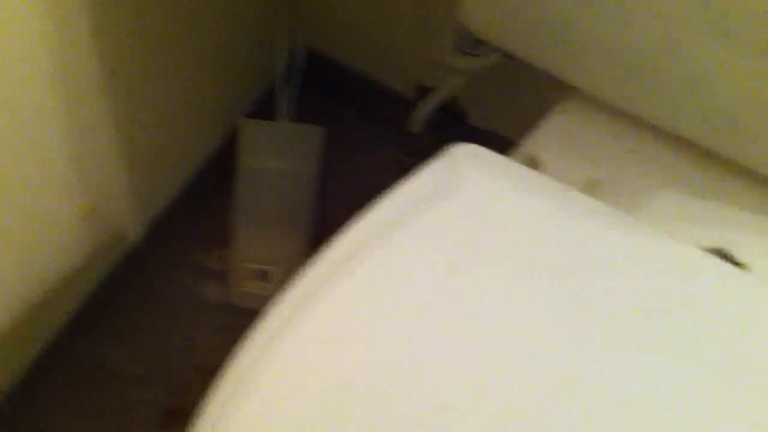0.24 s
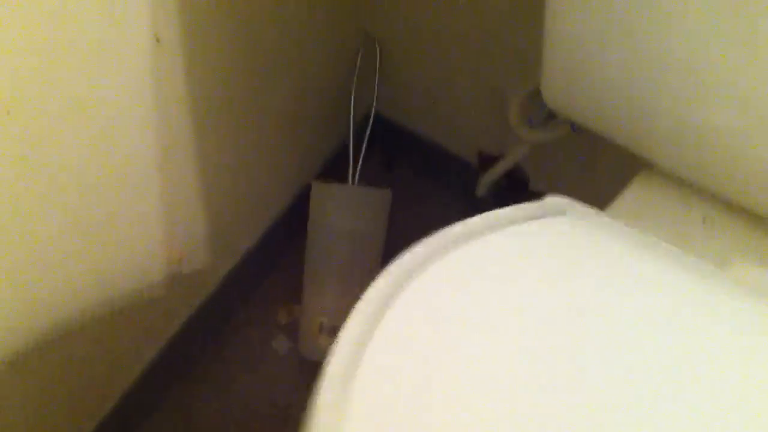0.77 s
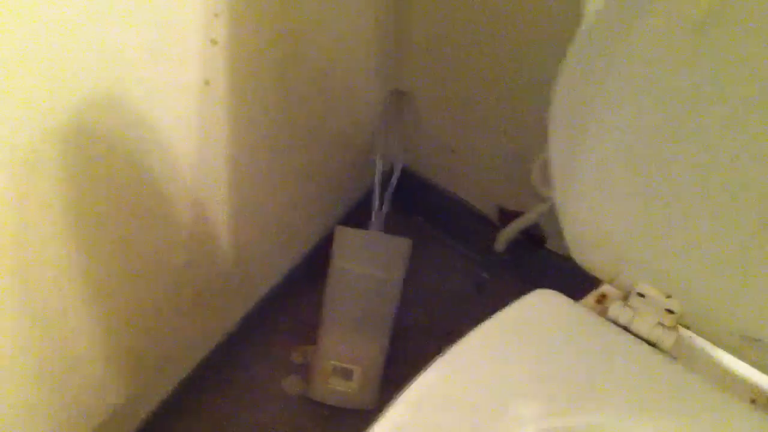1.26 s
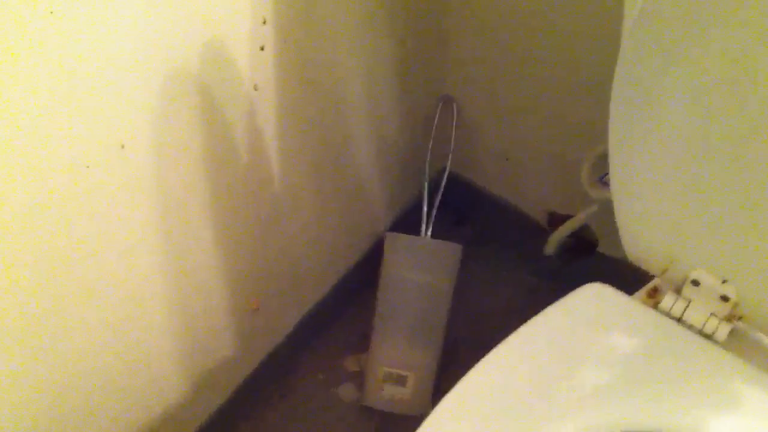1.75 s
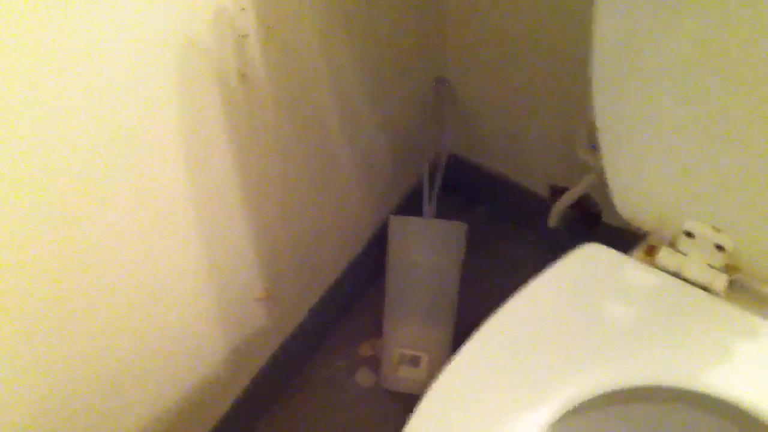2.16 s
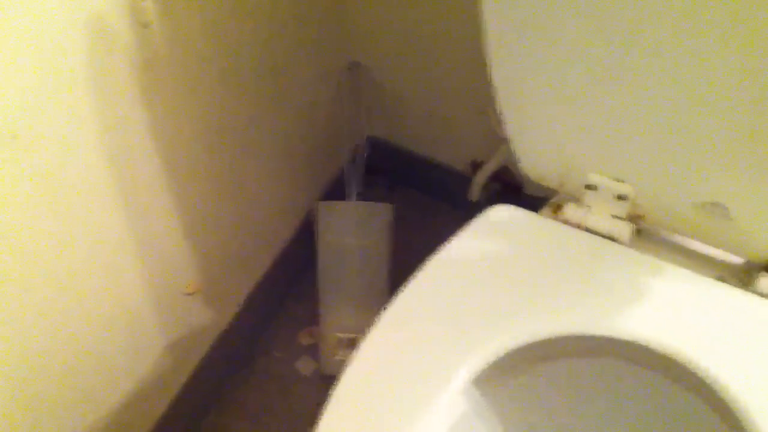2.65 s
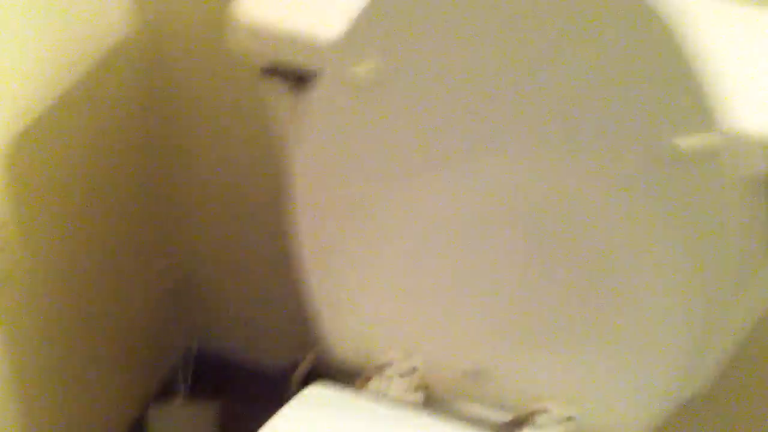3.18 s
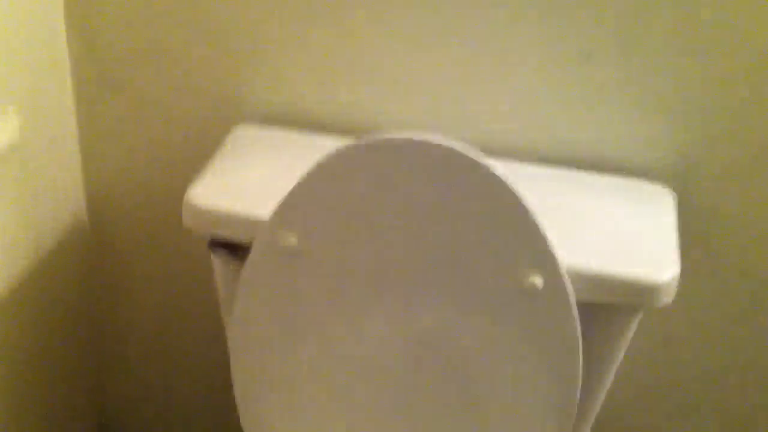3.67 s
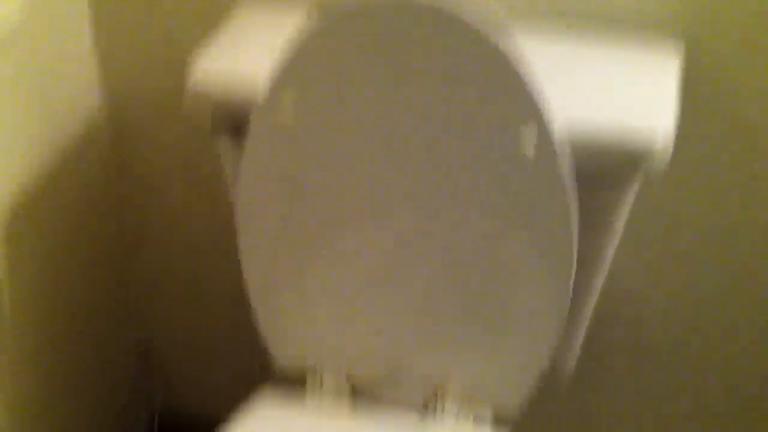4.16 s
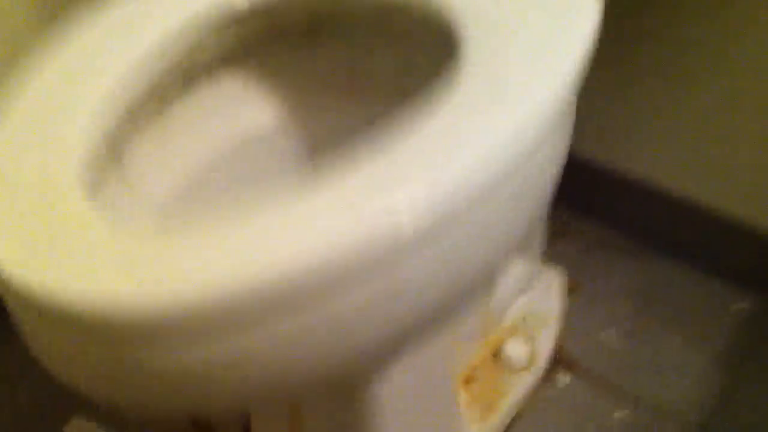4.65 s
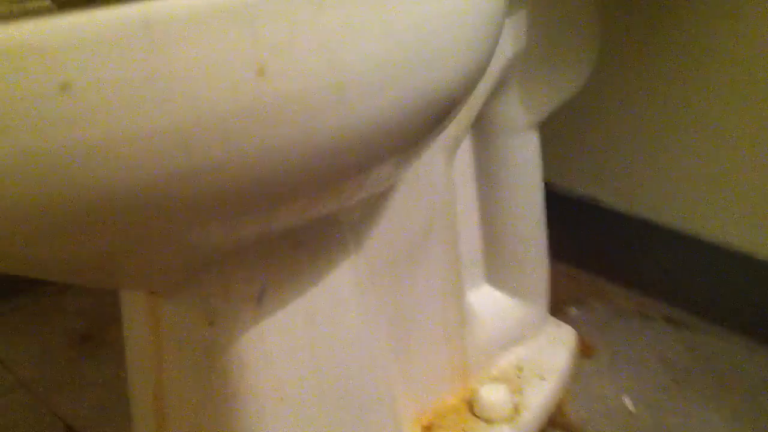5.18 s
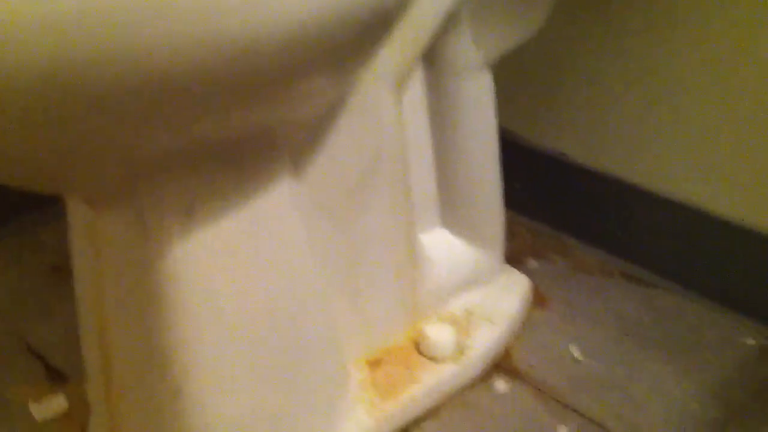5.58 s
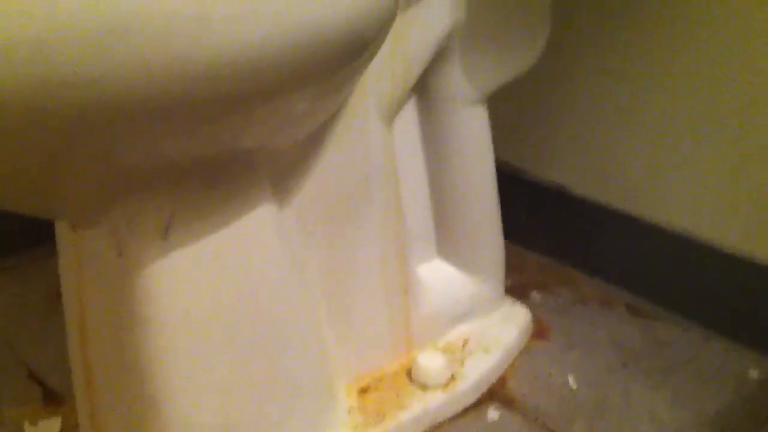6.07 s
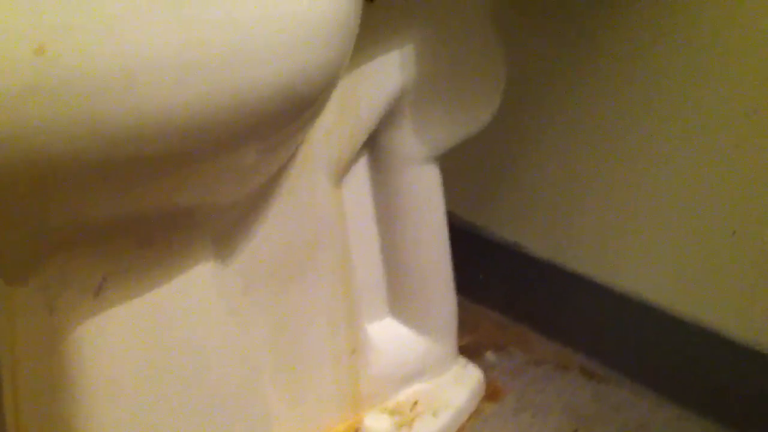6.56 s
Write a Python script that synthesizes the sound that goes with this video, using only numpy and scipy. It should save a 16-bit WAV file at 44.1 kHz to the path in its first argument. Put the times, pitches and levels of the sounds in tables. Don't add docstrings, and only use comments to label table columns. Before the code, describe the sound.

A small, hard-walled restroom, heard through a hand-held mono microphone. From the start an extractor fan runs quietly: soft air rush, dull rumble and a low, slightly wavering hum, with a very faint distant tap at 0.2 seconds. At about 2.6 a plastic toilet lid strikes the ceramic tank, by far the loudest event: a bright, hollow clack whose rapid rebounds blur together within a tenth of a second, ringing briefly with a short tiled wash. From 3.1 to 3.5 cloth and sleeve whisper faintly. Around 4.4 rustling resumes, with a faint tap near 4.7, and grows brighter as the microphone dips. At 5.1 the case is jolted in a short, coarse, stuttering scuff. The fan's rush then drops sharply behind the bowl. Small dull palm thuds and finger ticks cluster around 5.4 and 5.8, then only weak air, fading rumble, hum and hiss remain until 6.8.

```python
import sys
import numpy as np
from scipy import signal
from scipy.fft import rfft, irfft, next_fast_len
from scipy.io import wavfile
from scipy.ndimage import uniform_filter1d

SR = 44100
rng = np.random.default_rng(int(sys.argv[2]) if len(sys.argv) > 2 else 0)


def pcm_store(signal):
    levels = np.round(np.clip(np.atleast_2d(signal), -1, 1) * 32767)
    wavfile.write(sys.argv[1], SR, levels.astype(np.int16).T)


def to_linear_factor(level_db):
    exponent = np.asarray(level_db, float) / 20
    return 10 ** exponent


N = 300673

# (time [s], strength [dB])
CONTACTS = [
    (2.5885, -9.5),
    (2.5916, -10),
    (2.599, -11.5),
    (2.617, -20),
    (2.665, -27),
]
# (time [s], spot number)
MIC_SPOTS = [
    (0, 0),
    (1.2, 0),
    (1.6, 1),
    (2.7, 1),
    (3.3, 2),
    (4.4, 2),
    (5.1, 3),
    (6.82, 3),
]
JOLT_S = 5.082
LANDS_S = 5.142


def knock():
    return filtered(impact_modes() + tile_wash(), 2, 110, "high") + crack()


def impact_modes():
    # (frequency [Hz], level [dB], t60 [s])
    lid_tank_modes = [(191, 0, 0.18), (308, -12.5, .3), (376, -9, 0.2), (413.4, -16.5, .55), (465, -13, 0.38),
                      (509, -3.5, 0.41), (541.6, -13, 0.32), (594, -12, 0.29), (640, -17.5, .19),
                      (672, -16, 0.25), (782, -15, .25), (817, -20.5, 0.3), (863, -9, 0.28), (894, -6.5, 0.44),
                      (945, -14.5, 0.16), (994, -8, .22), (1027, -8, 0.15), (1330, -20.5, 0.27),
                  (1374, -15, 0.16), (1538, -8, 0.11), (1610, -3.5, 0.034), (1623, -15, .18),
                  (1837, -11.5, .22), (2125, -17, 0.13), (2510, -23.5, 0.14), (2773, -22.5, .26),
                  (3145, -23.5, 0.2), (3343, -22.5, .17),
                      (4040, -22, .14), (4825, -13.5, 0.079), (5200, -13, .15), (5615, -12, .12)]
    s, strength_db = np.transpose(CONTACTS)
    out = np.zeros(N)
    for hz, mode_db, t60_s in lid_tank_modes:
        uneven_db = rng.normal(0, 0.92, len(s))
        hits = clicks(s, to_linear_factor(strength_db + mode_db - 2.5 + uneven_db) * rng.choice([-1, 1]))
        r, w = to_linear_factor(-60 / (t60_s * SR)), 2 * np.pi * hz / SR
        out += signal.lfilter([0, np.sin(w)], [1, -2 * r * np.cos(w), r * r], hits)
    return filtered(out, 4, [120, 3000], "band")


def tile_wash():
    # (frequency [Hz], density [dB per Hz])
    wash_spectrum = [(80, -34.5), (180, -20), (350, -8.5), (600, -8), (950, -5), (1250, -13.5),
                     (1600, -14.5), (2500, -18.5), (4400, -31.5), (6000, -35.5), (8000, -50), (11000, -61)]
    # (frequency [Hz], t60 [s])
    wash_t60 = [(100, 0.85), (260, 0.51), (700, 0.3), (1840, 0.25), (4850, 0.29)]
    noise = coloured(wash_spectrum)
    edges_hz = 60 * 2 ** np.arange(0, 8.1, .5)
    out = np.zeros(N)
    for low, high in zip(edges_hz, edges_hz[1:]):
        t60_s = at_hz(wash_t60, np.sqrt(low * high))
        out += to_linear_factor(-7) * filtered(noise, 2, [low, high], "band") * decay(CONTACTS[0][0], t60_s, rise_s=0.001)
    return out


def crack():
    noise = filtered(rng.standard_normal(N), 4, [2500, 7500], "band")
    noise += 4.5 * resonance(noise, 5100, 600)
    return to_linear_factor(-22.5) * noise * decay(CONTACTS[0][0], 0.018, rise_s=0.00084)


def taps():
    # (time [s], level [dB], t60 [s], frequency [Hz])
    tap_events = [
        (0.192, -47.5, 0.14, 1390),
        (4.66, -48.5, 0.13, 2220),
        (4.661, -55, 0.055, 3640),
    ]
    white = rng.standard_normal(N)
    out = np.zeros(N)
    for s, db, t60_s, hz in tap_events:
        out += to_linear_factor(db + 3.0) * decay(s, t60_s, rise_s=0.0011) * narrow(white, hz, 0.71 * hz)
    return out


def handling():
    return jolt_scuff() + palm_thuds() + finger_ticks()


def jolt_scuff():
    # (frequency [Hz], density [dB per Hz])
    scuff_spectrum = [(22, -9), (70, -18.5), (130, -6.5), (250, -6.5), (450, -6.5), (800, -11),
                      (1200, -14.5), (1650, -20), (2500, -22.5), (4400, -30), (8000, -44), (17300, -58.5)]
    # (frequency [Hz], width [Hz], level [dB])
    case_modes = [(150, 70, 1.5), (346.3, 62, -3), (812, 27, 0.5), (1558, 350, -3)]
    rub = coloured(scuff_spectrum)
    even_rub = rub / np.sqrt(uniform_filter1d(rub ** 2, size=SR // 120))
    friction = bursts(slips(count=9)) * even_rub
    scuff = 0.61 * friction + sum(to_linear_factor(db - 0.5) * resonance(friction, hz, w) for hz, w, db in case_modes)
    body = filtered(scuff, 2, 1100)
    dulling_db = -159.5 * np.maximum(np.arange(N) / SR - JOLT_S, 0)
    return body + to_linear_factor(dulling_db) * (scuff - body)


def slips(count):
    gap_s, length_s, jolt_db, uneven_db = .0092, .0078, -9.5, 0.8
    rise_db, first_loss_db, fall_db = 3.5, 2, 2
    k = np.arange(count) - 3
    chance = rng.normal(0, 1, (count, 2)) * (k != 0)[:, None]
    loss_db = np.where(k > 0, first_loss_db + fall_db * k, rise_db * k ** 2)
    level_db = jolt_db - loss_db + uneven_db * chance[:, 0]
    start_s = JOLT_S + gap_s * (k + 0.14 * chance[:, 1])
    return list(zip(start_s, level_db, length_s * np.where(k <= 0, 1.3, .8)))


def palm_thuds():
    # (time [s], strength [dB], length [s])
    thud_events = [(4.647, -47, 0.012), (4.67, -50, 0.038), (5.039, -36.5, .004), (5.152, -42.5, 0.017),
                   (5.17, -46.5, 0.024), (5.215, -54, 0.01), (5.28, -62, 0.026), (5.34, -57, 0.016),
                   (5.427, -46.5, 0.025), (5.445, -43.5, 0.011), (5.465, -47, 0.014), (5.77, -50.5, 0.018)]
    return bursts(thud_events) * coloured([(80, -9.5), (140, 4), (300, -0.5), (600, -7), (1200, -18.5), (5000, -37)])


def finger_ticks():
    # (time [s], peak level [dB])
    tick_events = [
        (5.038, -39.5),
        (5.395, -44.5),
        (5.461, -43),
        (5.492, -49),
        (5.688, -48),
        (5.786, -44),
        (5.861, -40.5),
        (5.888, -54),
    ]
    s, peak_db = np.transpose(tick_events)
    return filtered(clicks(s, to_linear_factor(peak_db + 22)), 1, [130, 1300], "band")


def rustle():
    # (time [s], level [dB], length [s], share of top hiss [0-1])
    cloth_moves = [
        (3.136, -62, 0.12, .3),
        (3.28, -67.5, .12, 0.2),
        (3.456, -56.5, 0.14, .2),
        (4.38, -59, 0.15, 0.25),
        (4.562, -57.5, 0.14, 0.3),
        (4.67, -61, .07, .9),
        (4.82, -56.5, 0.2, 0.8),
        (5.0, -53.5, 0.15, 0.76),
        (5.081, -44.5, 0.065, 0.7),
    ]
    # (frequency [Hz], density [dB per Hz])
    cloth_spectrum = [(880, -20), (1500, -32.5), (1610, -25.5), (2630, -10), (6950, -6), (10700, -15),
                      (16400, -15), (17300, -17.5)]
    cloth = coloured(cloth_spectrum)
    dull = filtered(cloth, 4, 7000)
    moving = np.clip((LANDS_S - np.arange(N) / SR) / .008 + 1, 0, 1) * to_linear_factor(0.7 * drift(25))
    out = np.zeros(N)
    for s, db, length_s, top in cloth_moves:
        out += bursts([(s, db, length_s)]) * (dull + np.clip(top, 0, 1) * (cloth - dull))
    return moving * out


def sleeve_slides():
    # (time [s], level [dB], length [s], frequency [Hz])
    slide_events = [
        (3.1, -73, .14, 11500),
        (3.38, -74, 0.27, 11300),
        (4.36, -73, 0.0644, 10800),
        (4.494, -67.5, 0.11, 11000),
    ]
    white = rng.standard_normal(N)
    return sum(bursts([(s, db, length_s)]) * narrow(white, hz, 2500) for s, db, length_s, hz in slide_events)


def fan():
    return air_rush() + fan_rumble() + blade_tone()


def air_rush():
    # (frequency [Hz], density [dB per Hz])
    rush_spectrum = [(130, -15), (220, -4), (264, -10), (302, -9.5), (415, -8.5), (534, -12.5), (631, -6),
                     (698, -12.5), (759, -8), (959, -11.5), (1510, -13), (2800, -24), (12000, -41.5),
                     (15600, -52.5), (22000, -120)]
    # (frequency [Hz], width [Hz], level at the first two spots [dB], level from the third spot
    # on [dB])
    duct_modes = [(628, 44, -12.5, -22.5), (744.8, 14, -9, -8.5), (1250, 38, -17.5, -26.5),
                  (411, 12, -7.5, -25), (313, 20, -12.5, -19.5), (480, 30, -9.5, -30.5),
                  (910.4, 86, -22.5, -14)]
    rush_at_spot = [-48.5, -49, -49, -48.5]
    spot, = curves(MIC_SPOTS)
    low, since_s = lowering()
    shade_db = -20 + 6.5 * np.exp(-since_s / .4)
    rush_db = np.interp(spot, np.arange(len(rush_at_spot)), rush_at_spot) + low * shade_db
    away = np.clip(spot - 1, 0, 1)
    air = coloured(rush_spectrum)
    ducted = air.copy()
    for hz, width_hz, near_db, far_db in duct_modes:
        mode_db = near_db + away * (far_db - near_db) + 14.0 + 3 * drift(3)
        ducted += to_linear_factor(mode_db) * resonance(air, hz, width_hz)
    return to_linear_factor(rush_db + 0.7 * drift(11)) * restroom(unit(ducted), t60_s=0.27, wet_db=-5.0)


def fan_rumble():
    # (frequency [Hz], density [dB per Hz])
    rumble_spectrum = [(20, -19), (45, -17), (70, -19), (110, -11.5), (170, -5.5), (260, -10.5),
                       (750, -20.5), (1500, -52.5)]
    rumble_at_spot = [-51.5, -55, -56.5, -66]
    spot, = curves(MIC_SPOTS)
    low, since_s = lowering()
    high_db = np.interp(spot, np.arange(len(rumble_at_spot)), rumble_at_spot)
    rumble_db = (1 - low) * high_db + low * (-54 - 3.5 * since_s)
    return to_linear_factor(rumble_db - 3.0 + 1.3 * drift(12)) * coloured(rumble_spectrum)


def blade_tone():
    # (time [s], distance from the wall [m])
    wall_path = [
        (0, 0.11),
        (.5, .05),
        (3.12, 0.14),
        (3.35, 0.36),
        (4.55, 0.57),
        (4.7, .23),
        (5.14, 0.17),
        (5.55, 0.33),
        (6.2, .29),
        (6.82, 0.33),
    ]
    tone_hz, sag_hz_per_s, tone_db = 206.3, 0.37, -51.5
    distance_m, = curves(wall_path)
    standing = np.cos(2 * np.pi * tone_hz * distance_m / 343)
    hz = tone_hz - sag_hz_per_s * np.arange(N) / SR + 0.34 * drift(19)
    phase = 2 * np.pi * np.cumsum(hz) / SR
    return np.sqrt(2) * standing * to_linear_factor(tone_db + 1.3 * drift(8.6)) * np.sin(phase)


def lowering():
    since_s = np.arange(N) / SR - LANDS_S
    return np.clip(since_s / 0.055 + 1, 0, 1), np.maximum(since_s, 0)


def restroom(x, t60_s, wet_db):
    spot, = curves(MIC_SPOTS)
    t = np.arange(SR // 2) / SR
    tail = to_linear_factor(-60 * t / t60_s) * (t > .008)
    wet = np.zeros(N)
    for k in range(4):
        echo = signal.fftconvolve(x, unit(tail * rng.standard_normal(len(tail))))[:N]
        wet += np.sqrt(np.clip(1 - abs(spot - k), 0, 1)) * unit(echo)
    y = x + to_linear_factor(wet_db) * wet
    return y / np.sqrt(uniform_filter1d(y ** 2, size=SR // 2, mode="reflect"))


def mic_hiss():
    # (frequency [Hz], density [dB per Hz])
    hiss_spectrum = [(1000, -1), (3000, 0), (6000, 0), (10000, -5), (14000, -2.5), (17300, -2)]
    return to_linear_factor(-70.5 + 1.0) * coloured(hiss_spectrum)


def unit(x):
    return x / np.sqrt(np.mean(x ** 2) + 1e-20)


def curves(rows):
    s, *columns = np.transpose(rows)
    return [np.interp(np.arange(N) / SR, s, c) for c in columns]


def at_hz(points, hz):
    point_hz, value = np.transpose(points)
    return np.interp(np.log(hz), np.log(point_hz), value)


def coloured(spectrum):
    size = next_fast_len(N)
    hz = np.maximum(np.arange(size // 2 + 1) * SR / size, 1)
    below_oct = np.log2(np.maximum(spectrum[0][0] / hz, 1))
    above_oct = np.log2(np.maximum(hz / spectrum[-1][0], 1))
    gain = to_linear_factor(at_hz(spectrum, hz) - 30 * (below_oct + above_oct))
    return unit(irfft(rfft(rng.standard_normal(N), size) * gain, size)[:N])


def drift(rate_hz):
    return np.interp(np.arange(N) / SR * rate_hz, np.arange(400), rng.standard_normal(400))


def filtered(x, order, hz, kind="low"):
    return signal.sosfilt(signal.butter(order, hz, kind, fs=SR, output="sos"), x)


def resonance(x, hz, width_hz):
    r = np.exp(-np.pi * width_hz / SR)
    poles = [1, -2 * r * np.cos(2 * np.pi * hz / SR), r * r]
    return signal.lfilter([(1 - r * r) / 2, 0, (r * r - 1) / 2], poles, x)


def narrow(x, hz, width_hz):
    return unit(resonance(resonance(x, hz, width_hz), hz, width_hz))


def decay(s, t60_s, rise_s):
    t = np.maximum(np.arange(N) / SR - s, 0)
    return (1 - np.exp(-t / rise_s)) * to_linear_factor(-60 * t / t60_s)


def bursts(rows):
    t = np.arange(N) / SR
    return sum(to_linear_factor(db) * np.exp(-2 * ((t - s) / length_s) ** 2) for s, db, length_s in rows)


def clicks(times_s, gains):
    out = np.full(N, 1e-18)
    out[[round(s * SR) for s in times_s]] = gains
    return out


def scene():
    return (knock() + taps() + handling() + rustle() + sleeve_slides() + fan() + mic_hiss())[None]


def band_limit(x):
    return signal.sosfilt(signal.butter(12, 17430, fs=SR, output="sos"), x)


def record(dry):
    loud = 1.335 * np.tanh(dry / 1.274)
    thin = filtered(loud, 3, 85, "high") + to_linear_factor(-14) * filtered(loud, 3, 85)
    return band_limit(np.clip(thin, -1, 1))


dry = scene()
out = record(dry)
pcm_store(out)
```